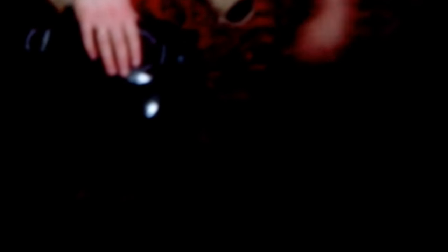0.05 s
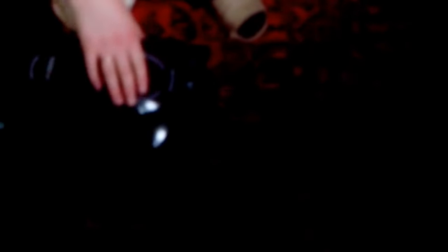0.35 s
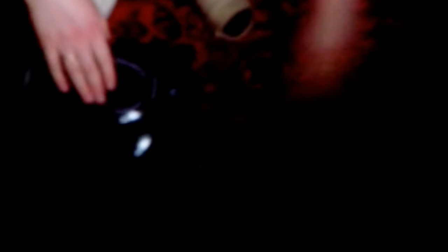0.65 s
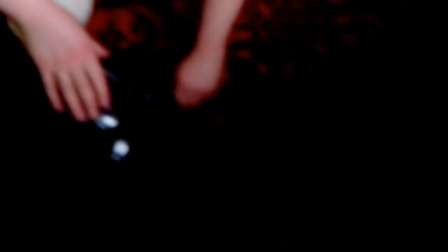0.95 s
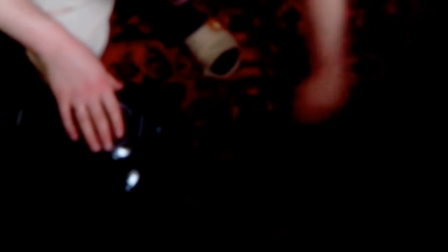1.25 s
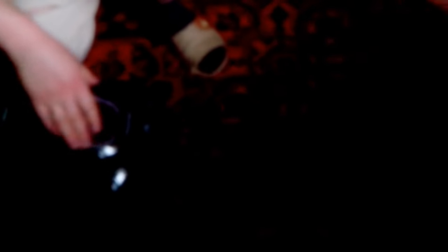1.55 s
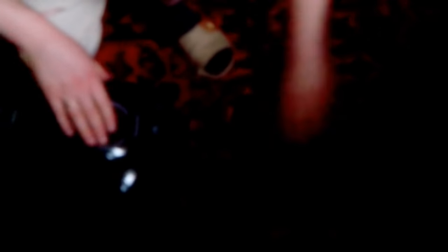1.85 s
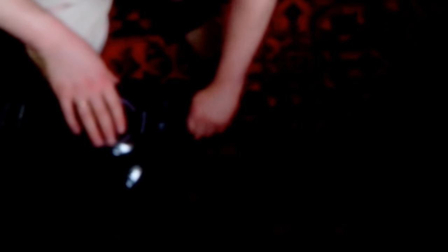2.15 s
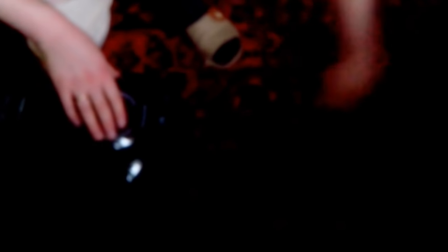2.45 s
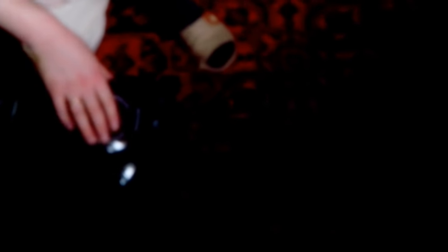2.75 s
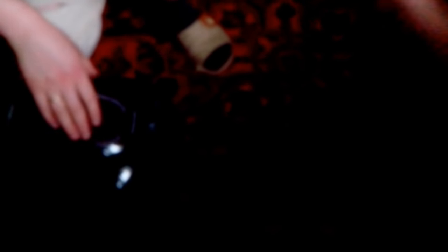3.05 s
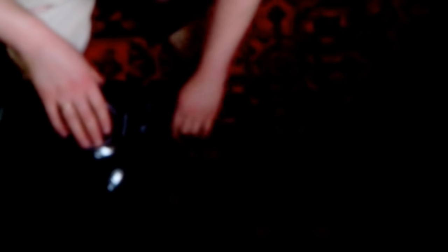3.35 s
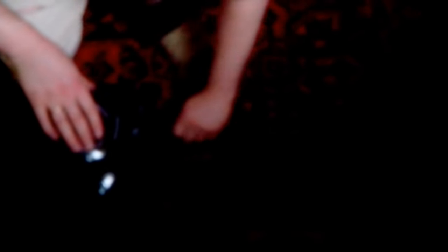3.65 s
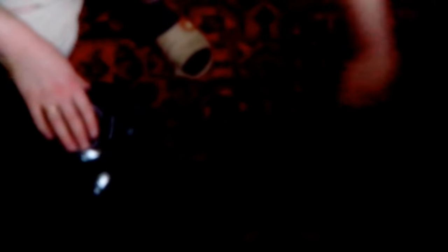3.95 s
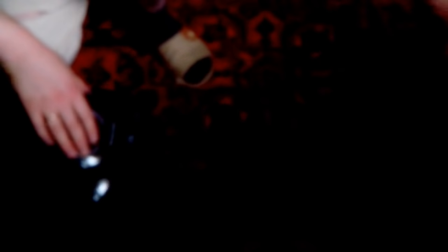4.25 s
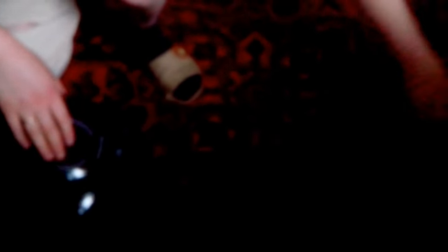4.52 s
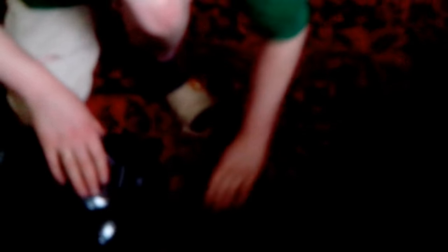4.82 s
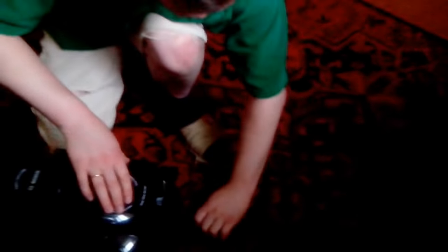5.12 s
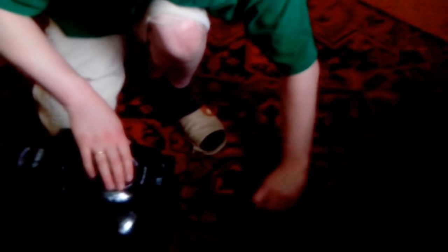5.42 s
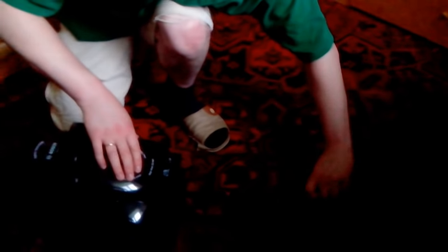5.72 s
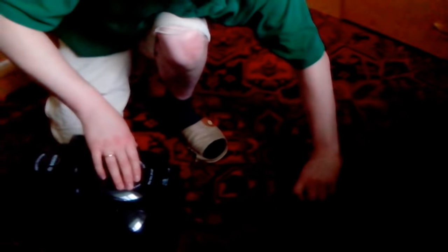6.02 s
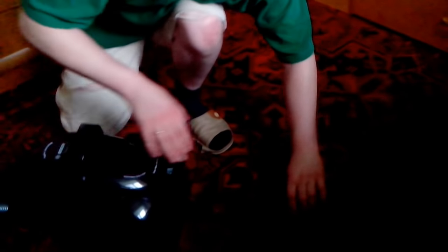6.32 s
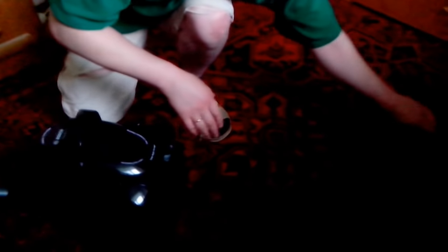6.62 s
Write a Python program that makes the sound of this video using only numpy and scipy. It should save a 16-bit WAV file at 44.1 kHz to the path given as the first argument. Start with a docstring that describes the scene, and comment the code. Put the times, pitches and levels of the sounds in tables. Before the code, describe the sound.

A power cord is pulled from a vacuum cleaner's reel in repeated strokes, with scraping, rattling and sharp plastic clacks in a quiet room.

```python
"""A vacuum cleaner's cord reel turns as the power cord is drawn out in five long pulls and a last tug.
The reel clacks in its plastic housing before and after the long pulls. While it turns, it rumbles,
scrapes and bumps, and the cord hisses through the outlet. The slack cord flops onto the carpet,
and hands thud softly on the machine and the floor of a quiet room."""
import sys
import numpy as np
from scipy import signal
from scipy.fft import rfft, irfft, next_fast_len
from scipy.io import wavfile
from scipy.ndimage import map_coordinates

SR = 44100
rng = np.random.default_rng(int(sys.argv[2]) if len(sys.argv) > 2 else 0)


def waveform_to_disk(signal):
    """Save audio, clipped to [-1, 1], as 16-bit WAV at the path in sys.argv[1]."""
    frames = np.transpose(np.atleast_2d(signal))
    scaled = np.clip(frames, -1, 1) * 32767
    samples = np.round(scaled).astype(np.int16)
    wavfile.write(sys.argv[1], SR, samples)


N = 294588
TIME = np.arange(N) / SR
AGE = np.arange(SR // 3) / SR  # seconds since a blow

# The room's echo. Each row: frequency in Hz, seconds to fade by 60 dB.
ROOM_ECHO = [(120, 0.32), (400, 0.29), (1200, 0.24), (3000, 0.25), (7000, 0.16)]
# The ringing notes of the plastic housing. Each row: pitch in Hz, relative level in dB,
# seconds to fade by 60 dB.
HOUSING_NOTES = [(275.7, -14, 0.15), (360.6, -5.5, 0.23), (519.2, 0, 0.39), (570, -6, 0.27),
                 (836, 14, 0.18), (1079, 8.5, 0.16), (1305, -9.5, 0.034), (1525, 6.5, 0.067),
                 (1625, 13, 0.026), (1744, 7.5, 0.11), (2150, 2.5, 0.09), (2447, -10, .08),
                 (3260, -11.5, .07), (4200, -13, .06), (4250, -26, .06), (6330, -17.5, .07)]

# The tone of each sound, from bass to treble. Each row: frequency in Hz, relative level in dB.
BACKGROUND_TONE = [(15, -52.5), (25, -20.5), (118, -8.5), (160, -6.5), (209, -13.5), (259, -5), (284, -9.5),
                   (388, -11), (416, -8.5), (640, -15), (1010, -15), (1110, -18), (4970, -24.5),
                   (6770, -28.5), (7450, -40), (9680, -76), (16400, -120)]
THUD_TONE = [(25, -25), (48, -4.5), (80, 3.5), (110, 6.5), (145, -20.5), (400, -15.5), (1500, -42.5)]
TAP_TONE = [(100, 6), (400, 13.5), (800, -3), (1400, -7), (2300, 0), (4000, -16), (5000, -16), (7000, -41)]
FLOP_TONE = [(40, -39.5), (90, -8.5), (135, -5.5), (190, -1.5), (320, -4), (480, -15.5), (1200, -16),
             (3000, -41), (7000, -47.5)]
TICK_TONE = [(300, -18), (1500, -10.5), (3400, -8.5), (4200, 6), (5000, 0.5), (5800, -9), (7000, -13.5),
             (8000, -14.5)]
BUMP_TONE = [(40, -40), (100, -17.5), (200, -18.5), (245, 2), (280, -2), (345, 2), (410, -17.5), (600, -18),
             (2000, -50.5), (7000, -63.5)]
SCRAPE_TONE = [(150, -29), (430, -3), (550, 3), (720, 1.5), (1000, 2.5), (1100, 7.5), (1200, -3.5),
               (1550, 2), (2120, -6), (2400, -12.5), (3200, -23), (7000, -49.5)]
RUMBLE_TONE = [(40, -42), (100, -19.5), (210, -16), (245, -3.5), (280, -2), (302, -7.5), (335, 2),
               (365, -5), (410, -15), (700, -18), (2000, -46.5)]
HISS_TONE = [(1500, -7.5), (3100, -4.5), (4400, 4), (5200, -2.5), (6000, -12), (6850, -7), (7500, -35)]
CLACK_TONE = [(60, -23.5), (220, -15.5), (275, -1.5), (360, 0), (420, -8.5), (560, 1), (730, -8),
              (1200, 2.5), (1420, 4), (2100, -3), (3200, -21), (3700, -14), (5500, -16.5), (6500, -15),
              (7500, -28)]

# Single blows of the hands, cord and reel. Each row: start in seconds, relative level in dB.
HAND_THUDS = [(0.894, -37), (0.996, -38.5), (1.022, -24.5), (2.109, -42), (2.496, -38), (6.145, -39),
              (6.24, -44), (6.514, -34), (6.563, -44.5)]
HAND_TAPS = [(6.145, -34), (6.179, -34.5), (6.564, -32)]
CORD_FLOPS = [(0.638, -27.5), (1.753, -27), (3.026, -34), (4.664, -33.5)]
PLASTIC_TICKS = [(0.3791, -17), (1.3197, -21.5), (1.3922, -23.5), (3.3293, -25)]
AXLE_BUMPS = [(0.248, -20.5), (0.277, -24.5), (1.432, -25), (3.928, -16.5), (3.95, -16.5), (4.246, -25.5),
              (5.362, -25.5), (5.663, -24.5)]

# Pulls on the cord. Each row: start, moment the cord goes tight, spin-up length and stop, all in
# seconds, then relative level in dB, cord hiss in dB compared with that level.
CORD_PULLS = [(-0.06, 0.094, 0.074, 0.68, -34.5, -9), (1.168, 1.327, 0.072, 1.794, -35.5, -11),
              (2.32, 2.468, 0.017, 3.03, -35, -12), (3.704, 3.859, 0.1, 4.375, -32.5, -13.5),
              (5.28, 5.397, 0.08, 5.912, -36, -18), (5.88, 5.923, 0.12, 6.15, -41, -18.5)]
# Light knocks on the housing. Each row: start in seconds, relative level in dB, treble in dB.
LIGHT_KNOCKS = [(0.066, -36.5, -14.5), (0.168, -35.5, -18), (0.211, -37.5, -16.5), (0.378, -27.5, -19),
                (0.402, -32, -17), (0.639, -49.5, -12), (0.919, -45, -5), (0.937, -45.5, -9),
                (1.318, -34, -25), (1.388, -30, -18.5), (1.491, -32.5, -35), (1.563, -30.5, -12.5),
                (1.815, -48, -15.5), (2.055, -46.5, -12.5), (2.08, -47.5, -16), (2.471, -30.5, -14),
                (2.525, -32, -26), (2.59, -34, -15), (2.668, -34.5, -17), (2.713, -33, -17),
                (3.399, -37.5, -7.5), (4.037, -34.5, -20), (4.122, -45, -20), (4.335, -43.5, -11.5),
                (4.521, -53.5, -16), (4.611, -56, -35), (4.942, -54.5, -23), (4.977, -46, -5),
                (5.905, -45.5, -21), (5.944, -47, -12), (6.205, -45.5, -16.5), (6.306, -53.5, -23)]
# The reel coming to rest. Each row: start in seconds, relative level in dB, bass in dB,
# build-up in seconds.
STOP_CLATTERS = [(0.476, -19, -13.5, 0.0052), (1.601, -23.5, -1, 0.011), (2.907, -25.5, -5.5, 0.023),
                 (4.359, -30.5, -1.5, 0.018)]
# The reel hitting its brake. Each row: start in seconds, relative level in dB, bass in dB.
BRAKE_CLACKS = [(1.039, -22.5, -0.5), (2.206, -20, -2), (3.592, -17.5, -4.5), (5.188, -20, -2.5)]


def gain(db):
    """Turn decibels into a number to multiply by."""
    return 10 ** (np.asarray(db) / 20)


def normalise(sound):
    """Scale a sound so that its average strength (rms) is 1."""
    return sound / np.sqrt(np.mean(sound ** 2) + 1e-20)


def normalise_hit(sound):
    """Scale a blow so that its first 30 ms have an average strength of 1."""
    return sound / np.sqrt(np.mean(sound[:round(0.03 * SR)] ** 2) + 1e-20)


def fade(seconds):
    """A curve that drops by 60 dB in the given time."""
    return np.exp(-np.log(1000) * AGE / seconds)


def look_up(table, hz):
    """Read between a table's rows, on a scale where octaves are evenly spaced."""
    row_hz, values = np.transpose(table)
    return np.interp(np.log(hz + 1), np.log(row_hz + 1), values)


def colour(sound, tone):
    """Filter a sound to give it the tone in a table."""
    size = 4096
    gains = gain(look_up(tone, np.fft.rfftfreq(size, 1 / SR)))
    # folding the second half onto the first keeps the filter from ringing before a hit
    cepstrum = irfft(np.log(gains))
    cepstrum[1:size // 2] *= 2
    cepstrum[size // 2 + 1:] = 0
    response = irfft(np.exp(rfft(cepstrum)))
    return signal.fftconvolve(sound, response)[:len(sound)]


def band(sound, low_hz, high_hz):
    """Keep the part of a sound between two frequencies, with soft edges."""
    size = next_fast_len(len(sound) + SR // 50)
    hz = np.fft.rfftfreq(size, 1 / SR)
    below = lambda edge: 1 / (1 + (hz / edge) ** 6)
    return irfft(rfft(sound, size) * (below(high_hz) - below(low_hz)), size)[:len(sound)]


def add(track, start, sound):
    """Mix a sound into a track at a start time in seconds."""
    part = track[max(0, round(start * SR)):][:len(sound)]
    part += sound[:len(part)]


def grains(length, per_second, spread_db):
    """Tiny contacts of uneven size at random moments."""
    touching = rng.random(length) < per_second / SR
    sizes = gain(spread_db * np.sqrt(3) * rng.uniform(-1.2, 1, length))
    return normalise(touching * sizes * rng.choice([-1, 1], length))


def wobble(per_second):
    """A smooth curve through evenly spaced random values."""
    values = rng.standard_normal(int(N * per_second / SR) + 4)
    return map_coordinates(values, [TIME * per_second])


def in_room(sound, echo_db):
    """Add the room's short wash of echo, whose treble dies first."""
    hz, seconds, spectrum = signal.stft(rng.standard_normal(len(AGE)), SR, nperseg=256)
    decay = np.exp(-np.log(1000) * seconds / look_up(ROOM_ECHO, hz)[:, None])
    tail = signal.istft(spectrum * decay, SR, nperseg=256)[1]
    tail = tail[:len(AGE)] * (1 - np.exp(-AGE / 0.0039))
    echo = signal.fftconvolve(sound, tail / np.linalg.norm(tail))[:len(sound)]
    return sound + gain(echo_db) * echo


def blows(rows, tone, fade_s, echo_db):
    """Each blow is a short shudder of noise, coloured by the thing that is hit."""
    track = np.zeros(N)
    for start, db in rows:
        shudder = fade(fade_s) * rng.standard_normal(len(AGE))
        blow = in_room(colour(shudder, tone), echo_db)
        add(track, start, gain(db) * normalise_hit(blow))
    return track


def background():
    """A steady room murmur with a faint hiss."""
    return gain(-57) * normalise(colour(rng.standard_normal(N), BACKGROUND_TONE))


def hand_thuds():
    """Hands and machine thud deeply on the carpet."""
    return gain(-11) * blows(HAND_THUDS, THUD_TONE, fade_s=0.09, echo_db=-9.5)


def hand_taps():
    """Very short contacts make dry, dull taps as the hand lets go."""
    return gain(-15.5) * blows(HAND_TAPS, TAP_TONE, fade_s=0.0087, echo_db=-11)


def cord_flops():
    """The slack cord lands on the carpet, then touches again more softly."""
    second_touches = [(start + 0.023, db - 6) for start, db in CORD_FLOPS]
    return gain(-11) * blows(list(CORD_FLOPS) + second_touches, FLOP_TONE, fade_s=0.077, echo_db=-7)


def plastic_ticks():
    """Small, quick hits on plastic make sharp ticks."""
    return gain(-20) * blows(PLASTIC_TICKS, TICK_TONE, fade_s=0.015, echo_db=-4.5)


def axle_bumps():
    """The turning reel bumps heavily on its axle."""
    return gain(-12) * blows(AXLE_BUMPS, BUMP_TONE, fade_s=0.055, echo_db=-6)


def housing(push, ring_db):
    """A push is heard directly and also makes the plastic housing ring."""
    notes = np.zeros(len(AGE))
    for hz, db, fade_s in HOUSING_NOTES:
        strength = gain(db + rng.normal(0, 0.91))  # depends on the spot touched
        phase = rng.uniform(0, 2 * np.pi)
        notes += strength * np.sin(2 * np.pi * hz * AGE + phase) * fade(fade_s)
    ringing = signal.fftconvolve(push, notes)[:len(push)]
    return normalise(push) + gain(ring_db) * normalise(ringing)


def knock(db, bass_db, treble_db, build_s):
    """One knock: loose plastic parts chatter and swell to a hard snap."""
    rise = np.minimum(AGE / build_s, 1)
    fall = np.exp(-np.maximum(AGE - build_s, 0) / 0.0065)
    force = (0.17 + 0.64 * rise ** 1.11) * fall
    # each of three parts sounds from its own place, so it has its own echo
    chatter = sum(in_room(force * grains(len(AGE), per_second=1500, spread_db=5), echo_db=-3)
                  for part in range(3))
    snap_shape = (AGE >= 0.7 * build_s) * np.exp(-np.abs(AGE - 0.86 * build_s) / 0.0078)
    snap = in_room(snap_shape * rng.standard_normal(len(AGE)), echo_db=-2)
    push = normalise(chatter) + gain(-6.5) * normalise(snap)
    # a harder contact sounds brighter
    db_per_octave = 0.41 * (treble_db + 11)
    tone = [(hz, level + db_per_octave * np.log2(hz / 1000)) for hz, level in CLACK_TONE]
    clack = housing(colour(push, tone), ring_db=-12.5)
    # the spot that is hit sets the balance of bass and treble
    bass = gain(bass_db) * normalise_hit(band(clack, 75, 790))
    middle = normalise_hit(band(clack, 720, 3720))
    treble = gain(treble_db) * normalise_hit(band(clack, 2360, 7600))
    return gain(db - 1.5) * (bass + middle + treble)


def reel_speed(pull):
    """Speed from 0 to 1: the reel creeps, spins up as the cord goes tight, and slows as the arm runs out."""
    start, tight, spin_up, stop = pull[:4]
    ramp = lambda begin, seconds: np.clip((TIME - begin) / seconds, 0, 1)
    creep = 0.5 * ramp(start, seconds=0.065)
    spin = 0.5 * ramp(tight, spin_up)
    slowing = 1 - ramp(tight, stop - tight) ** 2.5
    return (creep + spin) * slowing


def light_knocks():
    """Cord and reel knock on the housing, sounding thinner while the cord is tight."""
    track = np.zeros(N)
    tightness = sum(reel_speed(pull) for pull in CORD_PULLS)
    for start, db, treble_db in LIGHT_KNOCKS:
        bass_db = 3 - 15.5 * np.interp(start, TIME, tightness)
        add(track, start, knock(db, bass_db, treble_db, build_s=0.0041))
    return track


def stop_clatters():
    """The reel clatters to rest at the end of a pull."""
    track = np.zeros(N)
    for start, db, bass_db, build_s in STOP_CLATTERS:
        add(track, start, knock(db, bass_db, treble_db=-13.5, build_s=build_s))
    return track


def brake_clacks():
    """The reel falls back hard against its brake before the next pull."""
    track = np.zeros(N)
    for start, db, bass_db in BRAKE_CLACKS:
        add(track, start, knock(db, bass_db, treble_db=-8, build_s=0.007))
    return track


def turning_reel():
    """The faster the reel turns, the louder it scrapes and rumbles and the cord rubs on the outlet."""
    scrape_level, rumble_level, hiss_level = np.zeros((3, N))
    for pull in CORD_PULLS:
        speed = reel_speed(pull)
        db, hiss_db = pull[4:]
        scrape_level += gain(db) * speed ** 1.57
        rumble_level += gain(db - 4.5) * speed ** 1.36
        hiss_level += gain(db + hiss_db) * speed ** 1.8
    jerk = normalise(gain(3.04 * np.tanh(wobble(per_second=70))))  # the cord sticks and slips
    scraping = jerk * grains(N, per_second=350, spread_db=2.5)
    loose_parts = gain(-6.5) * grains(N, per_second=70, spread_db=2.5)  # they tick inside the reel
    scrape = scrape_level * housing(colour(scraping + loose_parts, SCRAPE_TONE), ring_db=-17)
    rolling = jerk * grains(N, per_second=250, spread_db=4.5)
    rumble = rumble_level * normalise(colour(rolling, RUMBLE_TONE))
    rubbing = jerk * grains(N, per_second=3000, spread_db=3)
    hiss = hiss_level * normalise(colour(rubbing, HISS_TONE))
    return in_room(gain(-4) * (scrape + hiss), echo_db=-2) + in_room(rumble, echo_db=-7.5)


def scene():
    """Add all the sounds together in one channel."""
    small_hits = axle_bumps() + cord_flops() + hand_thuds() + plastic_ticks() + hand_taps()
    knocks = brake_clacks() + stop_clatters() + light_knocks()
    return (small_hits + knocks + turning_reel() + background())[None]


def record(dry):
    """Cut away the deepest bass and the highest treble."""
    low_hz, top_hz = 42, 7380
    thinned = signal.sosfilt(signal.butter(4, low_hz, "high", fs=SR, output="sos"), dry)
    size = next_fast_len(N + SR // 2)
    hz = np.fft.rfftfreq(size, 1 / SR)
    treble_cut = 1 / np.sqrt(1 + (hz / top_hz) ** 70)
    return irfft(rfft(thinned, size) * treble_cut, size)[:, :N]


dry = scene()
out = record(dry)
waveform_to_disk(out)
```